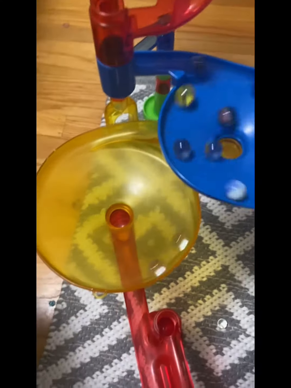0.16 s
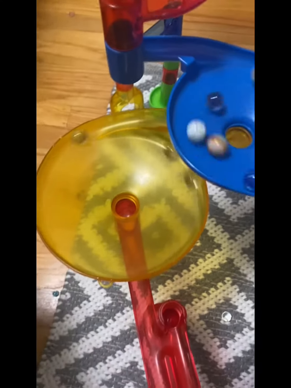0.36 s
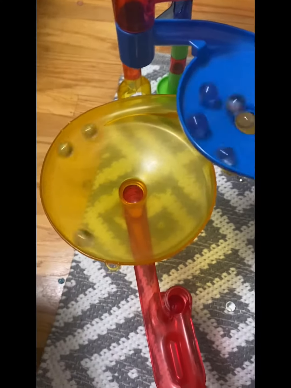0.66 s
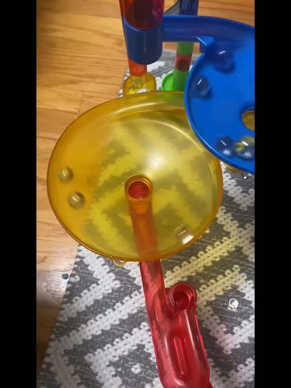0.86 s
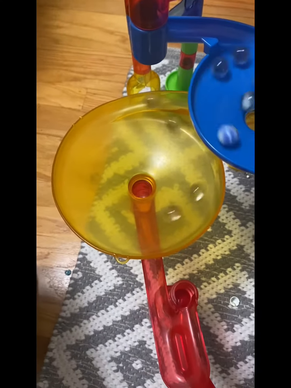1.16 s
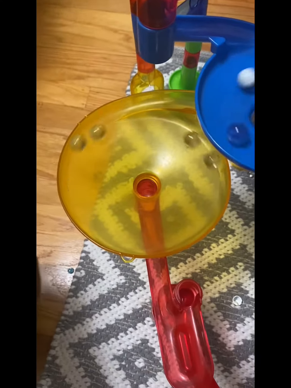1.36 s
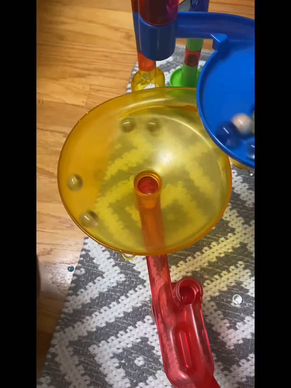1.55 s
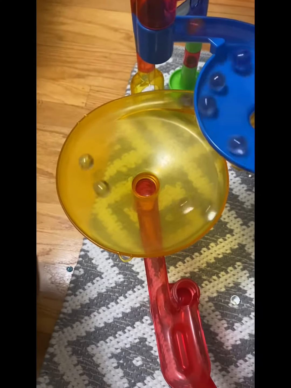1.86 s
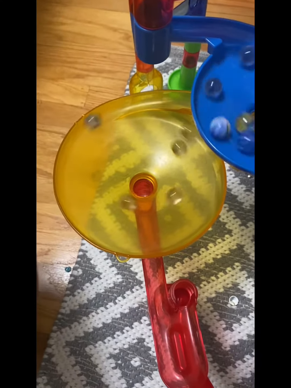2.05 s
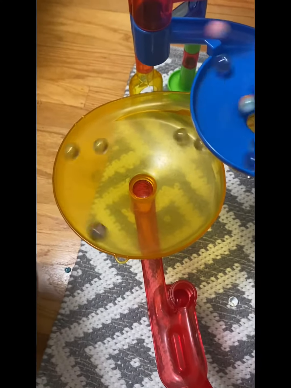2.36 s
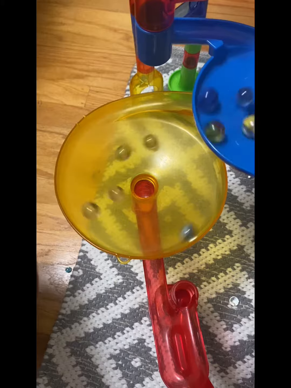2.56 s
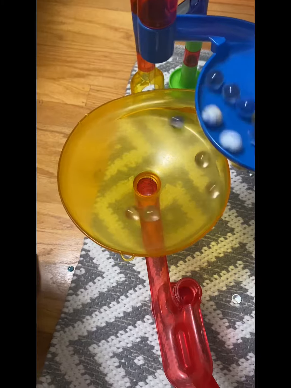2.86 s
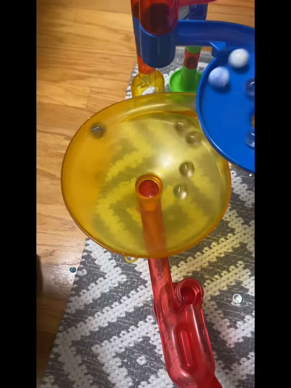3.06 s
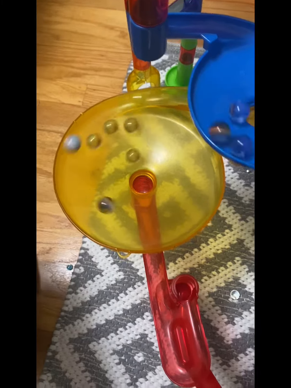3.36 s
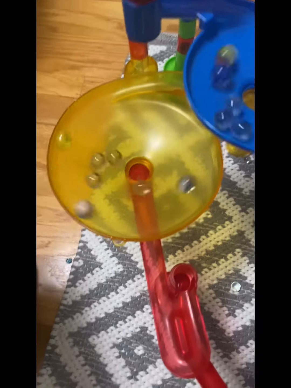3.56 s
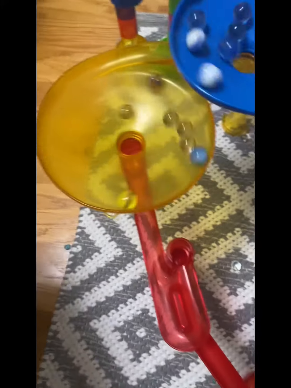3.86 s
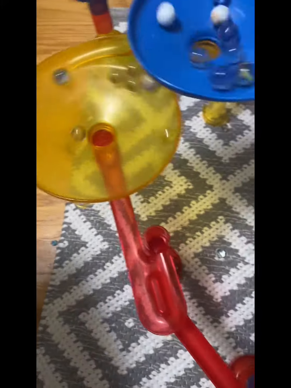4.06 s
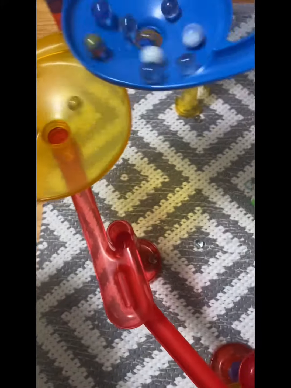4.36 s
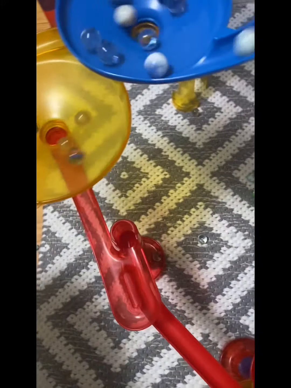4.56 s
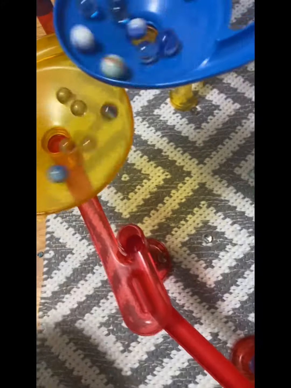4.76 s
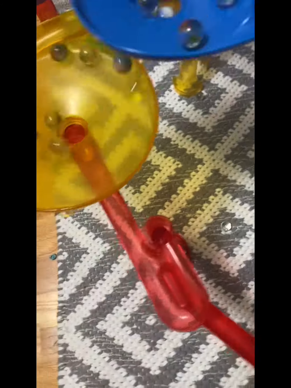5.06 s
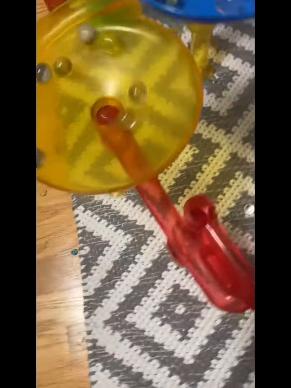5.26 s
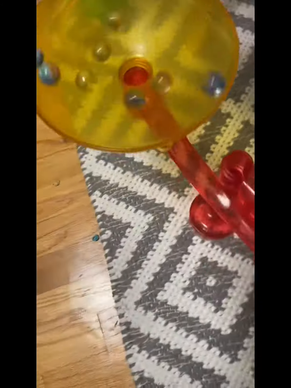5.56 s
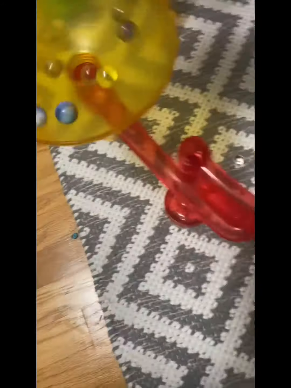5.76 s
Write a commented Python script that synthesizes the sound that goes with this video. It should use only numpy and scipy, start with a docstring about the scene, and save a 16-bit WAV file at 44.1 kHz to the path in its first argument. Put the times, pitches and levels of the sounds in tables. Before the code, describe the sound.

Glass marbles roll and swirl in plastic funnels, clacking sharply against the plastic in uneven bursts, with bright glassy ticks, in a quiet room.

```python
"""A quiet room: glass marbles circle in the funnels of a plastic marble run, close to a phone.
Clacks ring dense plastic modes, then rebound; glass ticks are the same modes cut short and bright.
Knocks stir the marbles, so quick runs swell into a clatter of small random collisions that soon settles.
Rolling is a stream of tiny bumps, skidding is filtered noise, and some bowls and throats sing on.
The tower thuds softly on the floor, and a short room tail of decaying noise follows every clack."""
import sys
import numpy as np
from scipy import signal
from scipy.fft import rfft, irfft, next_fast_len
from scipy.io import wavfile
from scipy.ndimage import uniform_filter1d

SR = 44100
rng = np.random.default_rng(int(sys.argv[2]) if len(sys.argv) > 2 else 0)


def generate_wav(sig):
    """Save sig (samples, or channels by samples) to the path in sys.argv[1] as 16-bit PCM at SR."""
    pcm = np.round(np.clip(np.atleast_2d(sig).T, -1, 1) * 32767).astype(np.int16)
    wavfile.write(sys.argv[1], SR, pcm)


N = 260624
TIME = np.arange(N) / SR

# marbles striking plastic: (time [s], relative level [dB], glassy edge [dB], part struck)
KNOCK_EVENTS = [(0.2172, -22, 4, "joint"), (0.247, -14.5, 0.5, "joint"), (0.334, -21, -1.5, "tube"),
                (0.605, -14.5, 2.5, "rim"), (0.6189, -22, -8, "spout"), (0.6382, -16, 7, "ramp"),
                (0.652, -17.5, 4, "lip"), (0.668, -11.5, 5, "lip"), (0.6825, -24, 6, "lip"),
                (0.699, -19.5, -2, "ramp"), (0.719, -22, -14, "bowl"), (0.753, -24, 7, "rim"),
                (1.0103, -18, -6, "ramp"), (1.3427, -21, -4, "ramp"), (1.382, -16.5, -1, "joint"),
                (1.4219, -13.5, -4.5, "ramp"), (1.516, -17, -2, "tube"), (1.586, -13, -3, "bowl"),
                (1.623, -29, 15, "ramp"), (1.6517, -14, 0, "funnel"), (1.657, -17.5, 10.5, "joint"),
                (1.683, -25, -14, "funnel"), (1.7, -32, -13, "joint"), (1.7141, -25.5, 7, "rim"),
                (1.739, -15.5, -5, "ramp"), (1.7903, -14.5, 3.5, "joint"), (1.8679, -12.5, 9, "lip"),
                (1.876, -18.5, 2, "lip"), (1.9385, -15.5, 1, "ramp"), (2.0591, -15, -3, "tube"),
                (2.1591, -12, 3.5, "joint"), (2.229, -15.5, -1.5, "joint"), (2.531, -16, 0, "funnel"),
                (2.544, -24, -10, "funnel"), (2.767, -25.5, 8, "tube"), (2.779, -14.5, -6.5, "bowl"),
                (2.8702, -24.5, 7, "ramp"), (2.9259, -13, -4, "bowl"), (2.967, -25.5, 4, "tube"),
                (3.0729, -14.5, 0.5, "spout"), (3.0976, -19, 4, "funnel"), (3.97, -22.5, 4, "ramp"),
                (4.0012, -15.5, 0, "tube"), (4.0813, -19.5, 0, "tube"), (4.1273, -22.5, -7, "tube"),
                (4.2449, -23, 2.5, "spout"), (4.314, -21, 13, "bowl"), (4.362, -14.5, 2, "rim"),
                (4.3755, -27, -3, "joint"), (4.3885, -21, -4, "bowl"), (4.4163, -11.5, -11, "bowl"),
                (4.4335, -12, 5, "lip"), (4.4728, -22, 4, "tube"), (4.746, -20, -6.5, "tube"),
                (4.7741, -21.5, -5, "joint"), (5.0561, -12.5, 1, "bowl"), (5.0913, -19.5, -6, "tube"),
                (5.142, -19.5, 1.5, "tube"), (5.1818, -14, 0.5, "tube"), (5.239, -14, -4, "ramp"),
                (5.2456, -12.5, -0.5, "bowl"), (5.2778, -18, -17, "rim"), (5.365, -18.5, -1, "spout"),
                (5.4025, -29.5, -18, "spout"), (5.457, -20.5, 3.5, "tube"), (5.5705, -14.5, 2, "rim"),
                (5.605, -30, -6, "tube"), (5.6501, -18, -2, "ramp"), (5.6836, -33, -9, "tube"),
                (5.726, -23.5, -2, "spout")]
# plastic parts that marbles strike, by name: main mode (mode_hz [Hz], mode_db [dB], t60_s [s]),
# raised cluster of upper modes (upper_hz [Hz], upper_db [dB]), weight of the hollow body (hollow_db [dB]),
# and how much a knock there stirs other marbles (stir_db [dB])
PLASTIC_PARTS = {"bowl": dict(mode_hz=1553, mode_db=4, t60_s=0.011, upper_hz=2820, upper_db=3, hollow_db=4, stir_db=3.5),
                 "funnel": dict(mode_hz=1905, mode_db=9.5, t60_s=0.032, upper_hz=1690, upper_db=-0.5, hollow_db=12, stir_db=-3),
                 "spout": dict(mode_hz=1720, mode_db=7.5, t60_s=0.034, upper_hz=3540, upper_db=5, hollow_db=-1, stir_db=-10.5),
                 "ramp": dict(mode_hz=2457, mode_db=4, t60_s=0.022, upper_hz=5400, upper_db=1, hollow_db=-6, stir_db=2.5),
                 "tube": dict(mode_hz=2520, mode_db=7.5, t60_s=0.036, upper_hz=3900, upper_db=0.5, hollow_db=-8.5, stir_db=-2.5),
                 "joint": dict(mode_hz=3523, mode_db=3.5, t60_s=0.029, upper_hz=4900, upper_db=1.5, hollow_db=-5, stir_db=-2),
                 "rim": dict(mode_hz=2514, mode_db=3.5, t60_s=0.014, upper_hz=4000, upper_db=6, hollow_db=-12, stir_db=-14),
                 "lip": dict(mode_hz=3890, mode_db=-2, t60_s=0.028, upper_hz=5350, upper_db=9.5, hollow_db=2.5, stir_db=-6.5)}
# colour of a knock: (frequency [Hz], level per Hz [dB])
KNOCK_SPECTRUM = [(120, -28), (450, -14), (900, -9.5), (1600, 1.5), (2600, 4), (5600, -1), (7000, -5.5),
                  (11500, -10), (16000, -23)]
# how hard the freely circling marbles jostle: (time [s], level [dB])
FREE_JOSTLE = [(0, -34), (.85, -34.5), (1.3, -31.5), (2.45, -23.5), (2.7, -31.5), (3.9, -38), (4.6, -31),
               (5.9, -30)]
# colour of the rolling: (frequency [Hz], level per Hz [dB])
ROLL_SPECTRUM = [(150, -31), (370, -4), (570, -6), (780, 2), (1600, 5), (2700, 5), (4000, -5), (7000, -10),
                 (10000, -13), (15500, -52)]
# glass on glass: (time [s], relative level [dB])
TICK_EVENTS = [(0.515, -16), (0.9707, -22), (0.9834, -17), (1.058, -21.5), (1.0805, -21), (1.093, -18.5),
               (1.394, -12.5), (2.504, -18.5), (2.5787, -16), (3.13, -22), (3.396, -19.5), (3.8, -21.5),
               (4.065, -23), (4.2977, -14), (4.6542, -17.5)]
# lasting resonances of bowls and tubes: (frequency [Hz], width [Hz], level over the dense modes [dB])
BOWL_RINGS = [(859, 21.6, 3.5), (1540, 200, -14), (1914, 13, -4.5)]
# a bowl or tube left ringing: (time [s], frequency [Hz], level [dB], t60 [s])
SINGING_PARTS = [(1.658, 1940, -40, 0.14), (1.741, 857, -20, 0.088), (1.793, 870, -22, 0.12),
                 (1.868, 858, -32, 0.23), (5.727, 1740, -23.5, 0.16), (5.761, 1685, -30, 0.12)]
# a marble spiralling down a funnel's throat: (time it drops through [s], level [dB], frequency [Hz])
SPIRAL_DROPS = [(2.545, -28.5, 1917), (5.76, -33.5, 2520)]
# colour of glass sliding on plastic, before a bass roll-off: (frequency [Hz], level per Hz [dB])
HISS_SPECTRUM = [(1500, 27), (4500, 7), (10500, -21), (12500, -49)]
# the room's ring: (frequency [Hz], t60 [s])
ROOM_DECAY = [(150, 0.18), (4000, 0.2), (14000, 0.15)]
# right microphone against the left: (frequency [Hz], likeness [0-1], level [dB], phase lag [rad])
RIGHT_PORT = [(300, .95, 0, 0), (866, .7, -1.5, -1.3), (1448, 0, -2, -2.5), (2615, .36, -2.5, -12.5),
              (4480, .44, -7, -12.5), (6600, .43, -5.5, -13), (8850, .95, 1.5, -8.5),
              (11200, .95, -1.5, -5.5), (16000, .8, 0, 3)]

DETUNE = 0.025  # spread, as a share, of a part's main mode with the place struck
CLUSTER_OCTAVES = 0.17  # half width of a part's cluster of upper modes
PATCHY_DB = 4.5  # how much the place struck favours some groups of modes over others
STIR_DB, RUN_DB = -32.5, -20.5  # jostling added after any knock, and between knocks that follow closely
SETTLE_S = 0.63  # time for a knock's stir to fall by 60 dB
TOP_HZ = 15900  # upper limit of the phone


def undb(db):
    """Decibels to gain."""
    return 10 ** (np.asarray(db) / 20)


def unit(x):
    """Scale to rms 1."""
    return x / np.sqrt(np.mean(x ** 2) + 1e-18)


def across(hz, table, axis=1):
    """Read a column of a table along log frequency."""
    table = np.array(table, float)
    return np.interp(np.log(np.maximum(hz, 1)), np.log(table[:, 0]), table[:, axis])


def fade(t, t60):
    """Exponential decay, 60 dB down after t60."""
    return np.exp(-np.log(1000) * t / t60)


def filtered(x, response):
    """Filter by a complex response given as a function of Hz."""
    size = next_fast_len(N + SR // 2)
    f = np.arange(size // 2 + 1) * SR / size + 1e-3
    return irfft(rfft(x, size) * response(f), size)[..., :N]


def resonance(f, hz, width):
    """Response of one damped mode, gain 1 at its centre."""
    return 1 / (1 + 1j * (f - hz * hz / f) / width)


def add(out, s, sound):
    """Mix a sound in at time s."""
    i = int(np.clip(s * SR, 0, N - 1))
    out[:, i:i + sound.shape[1]] += sound[:, :N - i]


def plastic(t60_s, slope, rise_s, crossing_s, count=340):
    """The dense, quickly damped modes of thin plastic: their frequencies and free rings."""
    hz = np.linspace(np.sqrt(90), np.sqrt(16000), count) ** 2
    hz = hz * (1 + .004 * rng.standard_normal(count))
    t = np.arange(SR // 10) / SR
    t60 = np.minimum(t60_s * (hz / 3000) ** -slope, .1)[:, None]
    # bending waves keep their strength until they reach the joints; high ones get there sooner
    crossing = crossing_s * np.sqrt(3000 / hz)[:, None]
    envelope = fade(np.maximum(t - crossing, 0), t60) * (1 - np.exp(-t / rise_s))
    return hz, np.exp(2j * np.pi * hz[:, None] * t) * envelope


def strike(shell, colour_db):
    """Each contact point favours its own mode groups and sends each mode differently to each microphone."""
    hz, rings = shell
    shape = rng.standard_normal((2, len(hz))) + 1j * rng.standard_normal((2, len(hz)))
    drift = uniform_filter1d(rng.standard_normal(len(hz) + 1), size=7)
    groups_db = PATCHY_DB * unit(np.diff(uniform_filter1d(drift, size=7)))
    # high modes lie further apart, so each carries more
    weights = shape * undb(colour_db + groups_db) * np.sqrt(np.sqrt(hz))
    sound = (weights @ rings).real
    onset = sound[:, :SR * 6 // 1000]  # the first 6 ms set the level
    return sound / np.sqrt(np.mean(onset ** 2))


def contacts(shell, rate, spread_db, size, colour_db):
    """Random small blows of uneven strength at one place, rung through the plastic."""
    size = size * undb(spread_db * np.minimum(rng.exponential(size=N), 3))
    blows = (rng.random(N) < rate / SR) * rng.choice([-1, 1], N) * size
    return signal.oaconvolve(blows[None], strike(shell, colour_db), axes=1)[:, :N]


def knocks(shell, gain_db, left_db, left_per_hollow, swell_s, bounce_db, bounce_s, scatter_db, count=3):
    """Clacks on plastic: dense modes, one strong mode and a raised cluster, then weakening rebounds."""
    out, hz = np.zeros((2, N)), shell[0]
    t = np.arange(shell[1].shape[1]) / SR
    body = across(hz, [(2000, 0.85), (2450, 0.11)])
    edge = across(hz, [(4000, 0.043), (8000, 1.0)])
    for s, db, glassy_db, part_name in KNOCK_EVENTS:
        part = PLASTIC_PARTS[part_name]
        hollow_db = part["hollow_db"]
        mode_hz = part["mode_hz"] * (1 + DETUNE * rng.standard_normal())
        cluster = np.exp(-(np.log2(hz / part["upper_hz"]) / CLUSTER_OCTAVES) ** 2)
        colour = across(hz, KNOCK_SPECTRUM) + hollow_db * body + glassy_db * edge
        colour = colour + part["upper_db"] * cluster
        envelope = fade(t, part["t60_s"]) * (1 - np.exp(-t / swell_s))
        tone = np.sin(2 * np.pi * (mode_hz * t + rng.random((2, 1)))) * envelope
        clack = strike(shell, colour) + undb(part["mode_db"]) * tone
        # thin, bright clacks come from close on the left; hollow ones from further down the tower
        pan = np.array([[.5], [-.5]]) * (left_db - left_per_hollow * hollow_db)
        add(out, s, clack * undb(db + gain_db + pan))
        rebound = strike(shell, colour)
        for k in range(count):
            s += bounce_s * rng.uniform(.4, 1.6)
            rebound_db = db + bounce_db - 2 * k + scatter_db * rng.standard_normal()
            add(out, s, rebound * undb(rebound_db))
    return out


def jostling():
    """How hard the marbles jostle, in dB: each knock stirs them, and in a quick run they never settle."""
    after, before = 0, 0
    for s, _, _, part in KNOCK_EVENTS:
        stir = (undb(PLASTIC_PARTS[part]["stir_db"]) * fade(np.abs(TIME - s), SETTLE_S)) ** 2
        after = after + stir * (TIME >= s)
        before = before + stir * (TIME < s)  # high when the next knock is near
    calm = undb(np.interp(TIME, *np.transpose(FREE_JOSTLE))) ** 2
    stirred = after * (undb(STIR_DB) ** 2 + undb(RUN_DB) ** 2 * before)
    return 10 * np.log10(calm + stirred)


def rattle(shell, bustle, db, per_s, crowding, scatter_db, bright_db, count=14):
    """Jostling marbles skip and touch: the busier they are, the more and the harder the small collisions."""
    hz, chatter = shell[0], 0
    crowd = undb(crowding * (bustle - bustle.mean()))
    for _ in range(count):
        tilt = bright_db + rng.uniform(-0.9, 1)  # dB per octave
        colour = across(hz, KNOCK_SPECTRUM) + tilt * np.log2(hz)
        chatter = chatter + contacts(shell, per_s * crowd, scatter_db, crowd ** -.5, colour)
    return unit(chatter) * undb(bustle + db)


def rolling(shell, bustle, db, follow, bumps_per_s, rough_db, far_side_db, count=5):
    """Each marble rides over tiny bumps; its colour shifts as it circles from near to far side of a bowl."""
    hum = 0
    for _ in range(count):
        angle = np.pi * (rng.uniform(1, 1.988) * TIME + rng.random())
        for side in (np.sin(angle), np.cos(angle) * undb(far_side_db)):
            hum = hum + contacts(shell, bumps_per_s, rough_db, side, across(shell[0], ROLL_SPECTRUM))
    return unit(hum) * undb(db + follow * (bustle - bustle.mean()))


def ticks(shell, gain_db, t60_s, tilt_db, again_s, grazes_per_s, graze_db, scatter_db):
    """Glass meets glass for an instant, and once more softly; throughout, marbles graze each other faintly."""
    hz, rings = shell
    brief = hz, rings * fade(np.arange(rings.shape[1]) / SR, t60_s)
    tilt = tilt_db * np.log2(np.minimum(hz / 10000, 1))  # per octave below 10 kHz
    colour = tilt + across(hz, [(12500, 15), (16000, -13)])
    out = 0
    for _ in range(2):  # two places, each with half the grazes
        out = out + contacts(brief, grazes_per_s / 2, scatter_db, undb(graze_db), colour)
    for s, db in TICK_EVENTS:
        tick = strike(brief, colour) * undb(db + gain_db)
        add(out, s, tick)
        add(out, s + again_s * rng.uniform(.5, 1), tick * .5 * rng.random())
    return out


def sings(swell_s, split_hz, twin_db, rough):
    """Some blows leave one bowl or tube mode ringing on; it beats against a close twin and flutters."""
    out, t = np.zeros((2, N)), np.arange(SR // 2) / SR
    for s, hz, db, t60 in SINGING_PARTS:
        phase = rng.random((2, 2, 1))
        lower = np.sin(2 * np.pi * ((hz - split_hz / 2) * t + phase[0]))
        upper = np.sin(2 * np.pi * ((hz + split_hz / 2) * t + phase[1]))
        pair = lower + undb(twin_db) * upper
        flutter = 1 + rough * unit(uniform_filter1d(rng.standard_normal(len(t)), size=300))
        envelope = fade(t, t60) * (1 - np.exp(-t / swell_s))
        add(out, s, pair * flutter * envelope * undb(db))
    return out


def spirals(width_hz, rise_s, fall_s, laps_per_s, waver_db):
    """A marble spinning in a funnel's throat makes it sing, swelling each lap, then dying after the drop."""
    out = 0
    for drop_s, db, hz in SPIRAL_DROPS:
        noise = rng.standard_normal((2, N))
        note = unit(filtered(noise, lambda f: resonance(f, hz, width_hz) ** 2))
        lap = np.cos(2 * np.pi * laps_per_s * (TIME - drop_s))
        envelope = fade(np.abs(TIME - drop_s), np.where(TIME < drop_s, rise_s, fall_s))
        out = out + note * undb(db + waver_db * lap) * envelope
    return out


def hiss(bustle, db, follow):
    """Glass skidding on smooth plastic: a fine, unbroken hiss that grows with the jostling."""
    def colour(f):
        return undb(across(f, HISS_SPECTRUM)) * (f / (f + 1000)) ** 2
    noise = unit(filtered(rng.standard_normal((2, N)), colour))
    return noise * undb(db + follow * (bustle - bustle.mean()))


def tower(thud_db, thud_hz, width_hz):
    """Knocks shake the whole tower, which thuds on the floor."""
    blows = np.zeros((1, N))
    for s, db, *_ in KNOCK_EVENTS:
        add(blows, s, undb(db) * rng.standard_normal((1, 1)))
    return unit(filtered(blows, lambda f: resonance(f, thud_hz, width_hz) ** 2)) * undb(thud_db)


def bump(s, db, hz, width_hz):
    """One dull, low bump: a single push through a broad low resonance, db at its peak."""
    push = np.zeros((1, N))
    add(push, s, np.ones((1, 1)))
    sound = filtered(push, lambda f: resonance(f, hz, width_hz) ** 2)
    return sound / np.abs(sound).max() * undb(db)


def room(x, wet_db, gap_s, treble_db):
    """A diffuse tail from nearby floor and walls; the treble dies first."""
    t = np.arange(SR // 2) / SR
    f = np.arange(len(t) // 2 + 1) * SR / len(t)
    noise, tail = rfft(rng.standard_normal((2, len(t)))), 0
    edges = [0, 300, 700, 1500, 3000, 6000, 10000, SR / 2]  # decay bands, Hz
    for lo, hi in zip(edges, edges[1:]):
        band = irfft(noise * ((f >= lo) & (f < hi)), len(t))
        tail = tail + band * fade(t, across((lo + hi) / 2, ROOM_DECAY))
    tail = tail * np.clip(t / gap_s - .5, 0, 1)
    wet = signal.oaconvolve(x, tail / np.sqrt(np.sum(tail ** 2) / 2), axes=1)[:, :N]
    return filtered(wet, lambda f: undb(wet_db + treble_db * across(f, [(2500, 0.69), (10000, 1.0)])))


def rumble(db, hz, width_hz):
    """The quiet room's low background: noise through a low resonance."""
    return unit(filtered(rng.standard_normal(N), lambda f: resonance(f, hz, width_hz) ** 2)) * undb(db)


def microphones(x):
    """Two ports: the right one's likeness to the left, level and phase lag vary with frequency."""
    def likeness(f):
        return np.clip(across(f, RIGHT_PORT), 0, .99)

    def shading(f):
        return undb(across(f, RIGHT_PORT, axis=2)) * np.exp(-1j * across(f, RIGHT_PORT, axis=3))

    shared = filtered(x[0], likeness)
    separate = filtered(x[1], lambda f: np.sqrt(1 - likeness(f) ** 2))
    return np.array([x[0], filtered(shared + separate, shading)])


def bowls(f):
    """The few lasting resonances stand out of the dense modes."""
    return 1 + sum(undb(db) * resonance(f, hz, width) for hz, width, db in BOWL_RINGS)


def scene():
    """All contacts sound through the same plastic; each kind reaches the room from its own place."""
    shell = plastic(t60_s=0.028, slope=0.29, rise_s=0.0003, crossing_s=0.0018)  # t60 at 3 kHz
    clacks = knocks(shell, gain_db=1.5, left_db=1.5, left_per_hollow=0.29, swell_s=0.0015,
                    bounce_db=-9.5, bounce_s=.011, scatter_db=-1.0)
    bustle = jostling()
    chatter = rattle(shell, bustle, db=-7.0, per_s=15, crowding=.45, scatter_db=4.5, bright_db=-1.0)
    roll = rolling(shell, bustle, db=-31.0, follow=0.17, bumps_per_s=70, rough_db=1.5, far_side_db=-5)
    glass = ticks(shell, gain_db=-7, t60_s=0.02, tilt_db=2.0, again_s=0.002,
                  grazes_per_s=16, graze_db=-40.5, scatter_db=3.0)
    ringing = sings(swell_s=0.0008, split_hz=22, twin_db=0.5, rough=0.18)
    ringing = ringing + spirals(width_hz=160, rise_s=1.5, fall_s=1.0, laps_per_s=15, waver_db=0.5)
    skid = hiss(bustle, db=-45, follow=0.43)
    layers = [filtered(x, bowls) for x in (clacks, roll, chatter)] + [glass, ringing, skid]
    near = sum(x + room(x, wet_db=-4.0, gap_s=0.0036, treble_db=-8.0) for x in layers)
    lows = tower(thud_db=-64, thud_hz=65.2, width_hz=12)
    lows = lows + bump(s=5.895, db=-28, hz=198, width_hz=250)
    lows = lows + rumble(db=-65, hz=57.4, width_hz=51)
    return microphones(near) + lows


def record(dry):
    """The phone cuts the deepest bass, rounds the loudest peaks and cuts the top."""
    bass_cut = signal.butter(2, 38, "high", fs=SR, output="sos")
    rounded = np.tanh(signal.sosfilt(bass_cut, dry))
    top_cut = signal.ellip(8, .1, 60, TOP_HZ, fs=SR, output="sos")
    return signal.sosfiltfilt(top_cut, rounded)


dry = scene()
out = record(dry)
generate_wav(out)
```